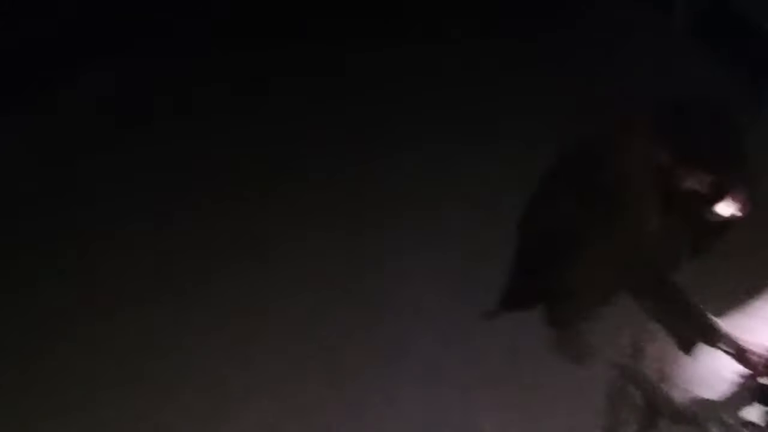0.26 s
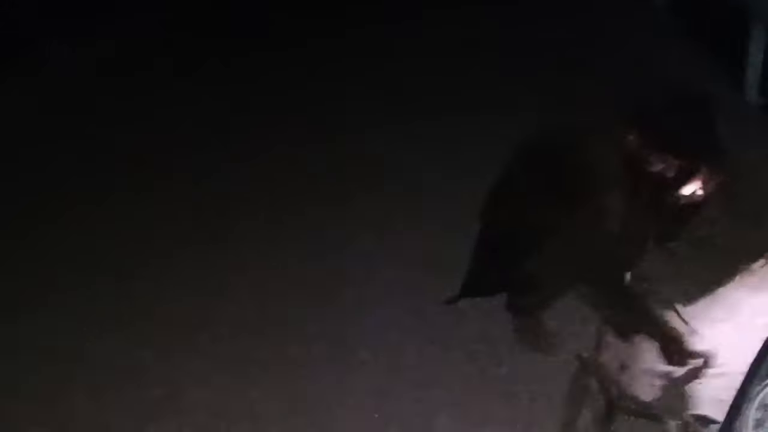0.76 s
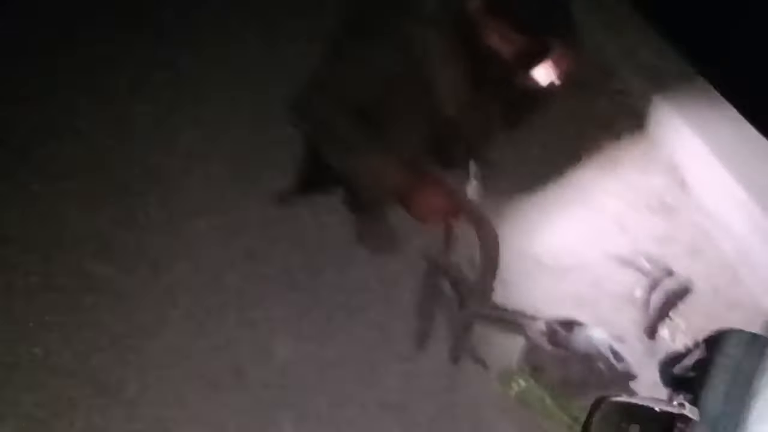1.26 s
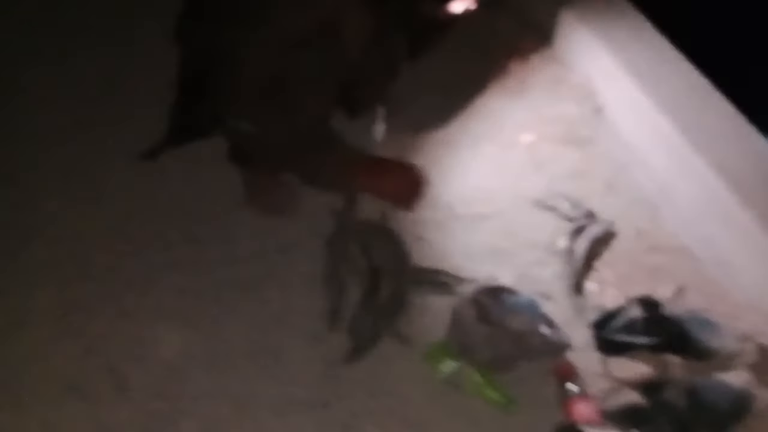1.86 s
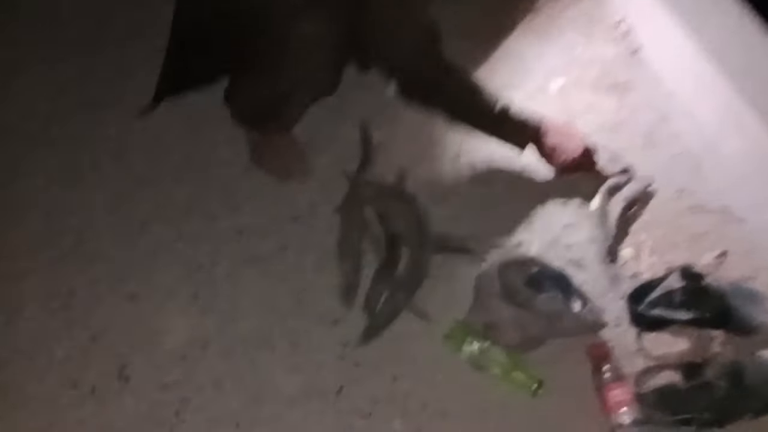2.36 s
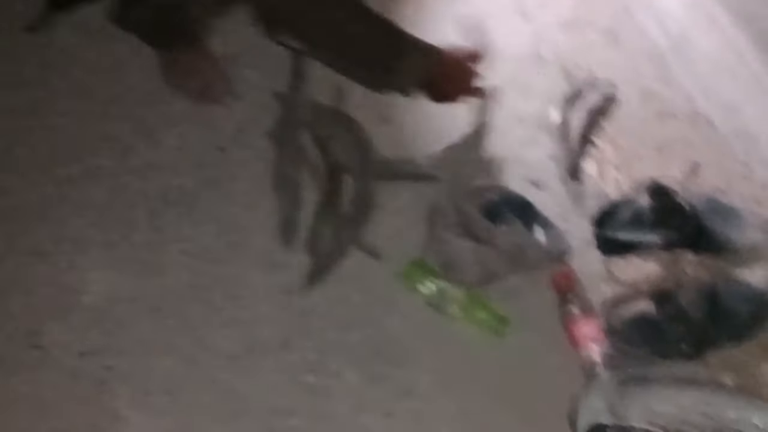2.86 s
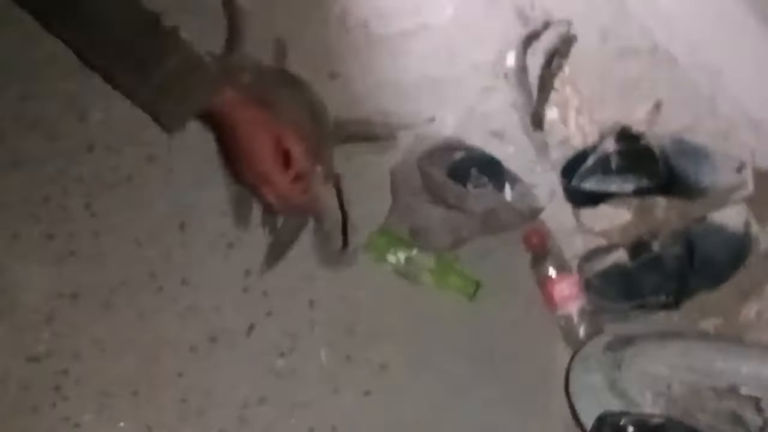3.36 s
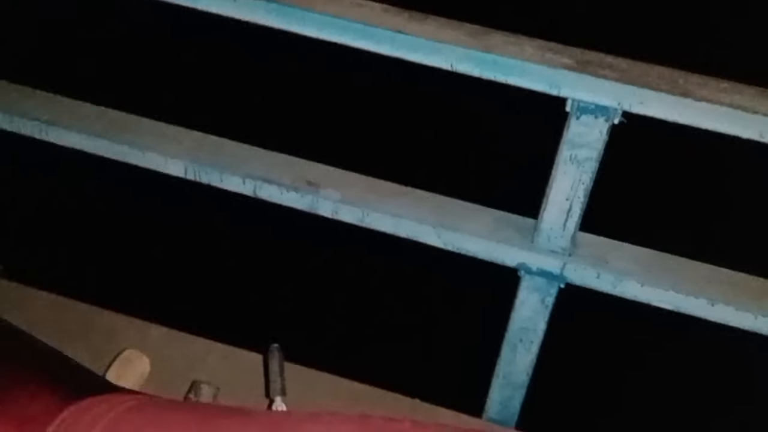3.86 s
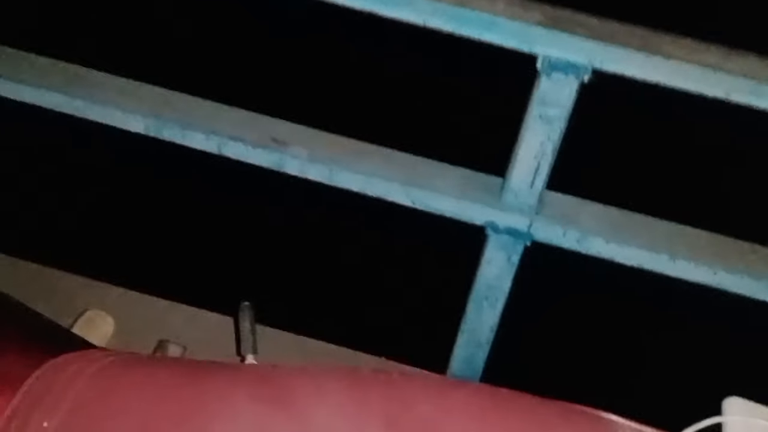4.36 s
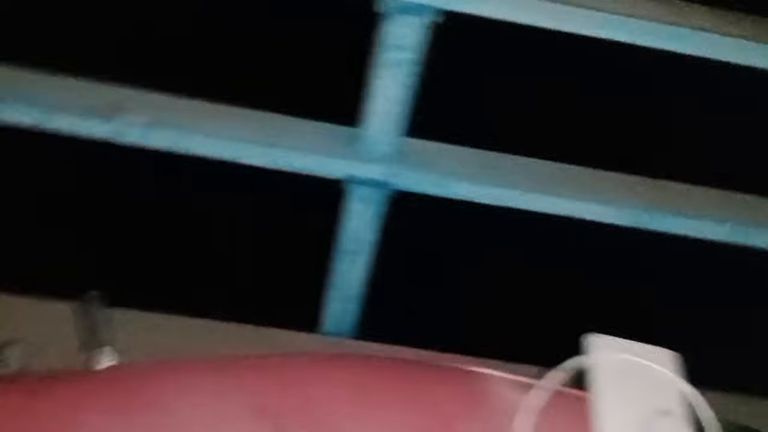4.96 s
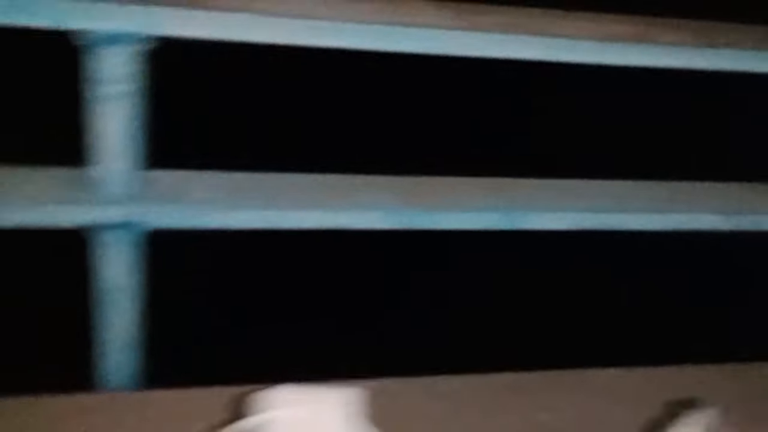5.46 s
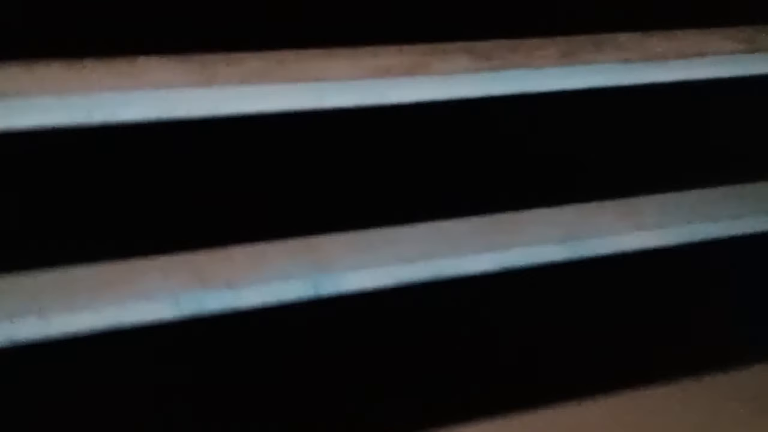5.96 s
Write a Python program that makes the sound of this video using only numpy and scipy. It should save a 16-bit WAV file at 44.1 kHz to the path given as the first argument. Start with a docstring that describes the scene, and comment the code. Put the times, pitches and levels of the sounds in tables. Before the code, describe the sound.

Night insects whistle and trill over faint hiss, with close rustles, a sharp knock near three seconds, then a stronger cricket chorus.

```python
"""Tree crickets whistle chirps and short, mostly rising phrases: near-sine notes with harmonics, outdoors at night.
Trilling comes in bursts of gated tone; far choruses shimmer as narrow noise bands over air, hiss and rumble.
Close by, things are dragged (grains) and set down on concrete (struck resonances), and a hand shifts on
the phone (dull low thumps). Part-way through the phone moves to another spot and the whole night is louder."""
import sys
import numpy as np
from scipy import signal
from scipy.fft import rfft, irfft, next_fast_len
from scipy.io import wavfile

SR = 44100
rng = np.random.default_rng(int(sys.argv[2]) if len(sys.argv) > 2 else 0)


def generate_wav(sig):
    """Save sig (samples, or channels by samples) to the path in sys.argv[1] as 16-bit PCM at SR."""
    pcm = np.round(np.clip(np.atleast_2d(sig).T, -1, 1) * 32767).astype(np.int16)
    wavfile.write(sys.argv[1], SR, pcm)


N = 273243


def from_db(db):
    """dB to gain."""
    return 10 ** (np.asarray(db) / 20)


def rms_one(x):
    """Scale to rms 1."""
    return x / np.sqrt(np.mean(x ** 2) + 1e-20)


def in_time(rows):
    """Columns of a curve table at every sample."""
    s, *columns = np.transpose(rows)
    return [np.interp(np.arange(N) / SR, s, column) for column in columns]


def coloured(x, spectrum):
    """Weight x by a spectrum drawn on a log frequency axis, -80 dB beyond its ends; rms 1."""
    size = next_fast_len(N)
    hz, db = np.transpose(spectrum)
    bins_hz = np.arange(1, size // 2 + 2) * SR / size   # one whole bin up avoids log(0)
    gain = from_db(np.interp(np.log(bins_hz), np.log(hz), db, -80, -80))
    return rms_one(irfft(rfft(x, size) * gain, size)[:N])


def drift(rate_hz):
    """Slow chance: noise through two equal one-pole lowpasses, rms 1."""
    r = np.exp(-2 * np.pi * rate_hz / SR)
    slow = signal.lfilter([1], [1, -2 * r, r * r], rng.standard_normal(N + SR))
    return rms_one(slow[SR:])   # drop the second in which the filter settles


def resonate(x, hz, width_hz):
    """One resonance with gain 1 on top."""
    r = np.exp(-np.pi * width_hz / SR)
    poles = [1, -2 * r * np.cos(2 * np.pi * hz / SR), r * r]
    return signal.lfilter([(1 - r * r) / 2, 0, (r * r - 1) / 2], poles, x)


def add(out, s, sound):
    """Mix a sound in, starting at s seconds."""
    i = round(s * SR)
    sound = sound[max(-i, 0):max(N - i, 0)]
    out[max(i, 0):max(i, 0) + len(sound)] += sound


# The two spots of the phone, one row each: air level/dB, low chorus level/dB, high chorus level/dB,
# treble hiss level/dB, rumble level/dB, lift of the far trill and murmur/dB
SPOTS = [(-75.5, -73, -72.5, -71.5, -83.5, -2.3), (-67.5, -61, -58.5, -61, -73.5, 4)]


def spot_levels(move_s=3.66, move_takes_s=0.039):
    """Each level passes from the first spot to the second as the phone moves."""
    moved = np.clip((np.arange(N) / SR - move_s) / move_takes_s + .5, 0, 1)
    return [first + (second - first) * moved for first, second in zip(*SPOTS)]


def patchy(x, patch_db, rate_hz):
    """Half-octave bands swell and sink on their own, as far-off small noises come and go."""
    out = x
    for low_hz in 100 * 2 ** np.arange(0, 5, .5):
        edges = signal.butter(1, [low_hz, low_hz * np.sqrt(2)], "band", fs=SR, output="sos")
        out = out + (from_db(patch_db * drift(rate_hz)) - 1) * signal.sosfilt(edges, x)
    return out


def chorus(hz, width_hz, throbs_per_s, throb_db):
    """Many distant wings: a steep-sided band of noise, throbbing unevenly."""
    edges = signal.butter(2, [hz - width_hz, hz + width_hz], "band", fs=SR, output="sos")
    band = resonate(signal.sosfilt(edges, rng.standard_normal(N)), hz, width_hz)
    throb = np.sin(2 * np.pi * np.cumsum(throbs_per_s * (1 + 0.14 * drift(1.3))) / SR)
    return rms_one(band * from_db(throb_db * throb + 2.2 * drift(9)))


def notes(rows, glide, waver, octave_db):
    """Near sines: pitch climbs through each note by glide (share per s) and wavers in proportion to it."""
    out, wobble, t = np.zeros(N), drift(170), np.arange(-4000, 4000) / SR
    for (s, hz, db, rise_ms, fall_ms), start in zip(rows, rng.random(len(rows))):
        # half height one rise before and one fall after the peak
        shape = .5 ** (((1000 * t / np.where(t < 0, rise_ms, fall_ms)) ** 2) ** .85)
        i = round(s * SR) % (N - len(t))
        pitch_hz = hz * (1 + glide * t + waver * wobble[i:i + len(t)])
        phase = 2 * np.pi * (np.cumsum(pitch_hz) / SR + start)
        octave = from_db(octave_db) * np.sin(2 * phase) * (hz < 6000)
        add(out, s + t[0], from_db(db) * shape * (np.sin(phase) + octave))
    return out


def far_whistles(level_db):
    """Distant crickets sing rising five-note phrases with third harmonics, at random moments."""
    rows = []
    phrases = rng.random((26, 3)) * [N / SR, 450, 6.0] + [0, 3950, -3]   # start s, Hz, dB
    for (s, hz, db), uneven in zip(phrases, rng.standard_normal((26, 5))):
        for k, u in enumerate(uneven):
            at, pitch = s + 0.049 * k + 0.0064 * u, hz + 60 * k + 15 * u
            rows.append((at, pitch, db - 9 + 3 * u, 14, 16))
            rows.append((at, 3 * pitch, db - 2.5 + 4 * u, 9, 9))
    return from_db(level_db) * notes(rows, glide=0.41, waver=.003, octave_db=-37.5)


def buzz():
    """A buzzing insect: four thin lines one stroke rate apart, wavering in level and phase."""
    t, out = np.arange(N) / SR, np.zeros(N)
    for k in range(4):
        line = np.sin(2 * np.pi * (9870 + 232 * k) * t + 1.5 * drift(5.2))
        out += from_db(4.0 * drift(2.8)) * line
    return out


# Spectra of the still air, treble hiss and rumble: f/Hz, relative level per Hz/dB
AIR = [(90, -24), (200, 5), (500, 0), (1300, -1), (2600, -5.5), (3300, -2.5), (4400, -4.5), (5100, -7),
       (7000, -7), (16000, -16.5)]
HISS = [(6500, -37), (7400, -18), (7750, 2), (8500, 5.5), (9400, -0.5), (11200, -3), (12200, -2),
        (13200, -4.5), (15900, -4.5)]
RUMBLE = [(15, -10), (30, -5), (55, -4.5), (120, 1), (260, -12)]
# Swell of the night's layers, added to the spot levels: t/s, air level/dB, low chorus level/dB,
# high chorus level/dB, hiss level/dB, rumble level/dB
SWELLS = [(0, -0.5, 2.5, 1, 1, -2.5), (.7, 1.2, 4, 1.5, 2, 3), (1.0, 2.5, 0, 2.5, 1, -6),
          (1.3, .1, 4.5, 2, 1, 13), (1.65, 4.5, -3.5, -6, 2.3, 4), (2.05, 1, -1.5, 2, 2.5, 1.5),
          (2.4, 0.3, -2, -3, 8, -.1), (2.7, 0.5, -4, -1, 0, 1), (3.1, 0.5, -6.5, 0.5, 3.5, -0.5),
          (3.55, -0.5, 1, -0.5, -1, -3), (3.7, 1.5, 0, -3.5, 1.5, 3), (3.9, 0, -0.5, .1, -2, -0.5),
          (4.3, -1.4, .1, 1, 0.3, -1), (4.7, 1.5, .1, -2, 1, -4), (5.0, -0.5, -0.3, 2, 1.5, -4.5),
          (5.3, 1.5, -0.8, 1, -1.5, 0), (5.8, -1.5, 0.6, -0.7, -1.5, -2.5), (6.2, 2.5, 1.2, 0, -1.5, -6.5)]


def night():
    """Still air, lumpy rumble and treble hiss as coloured noise, with choruses, a buzz and far singers."""
    air_db, low_db, high_db, hiss_db, rumble_db = np.add(spot_levels()[:-1], in_time(SWELLS))
    still = patchy(coloured(rng.standard_normal(N), AIR), patch_db=0.5, rate_hz=3.1)
    air = from_db(air_db + .5 * drift(9.1)) * still
    rumble = from_db(rumble_db + 1.5 * drift(4.0)) * coloured(rng.standard_normal(N), RUMBLE)
    hiss = from_db(hiss_db + 1.7 * drift(18)) * coloured(rng.standard_normal(N), HISS)
    low = from_db(low_db) * chorus(5906, 290, 15.0, 2.5)
    # far whistlers, run together
    blur = from_db(low_db - 21.5) * (chorus(4300, 60, 1.4, 4.0) + chorus(4500, 120, 21.0, 3.0))
    high = from_db(high_db) * (chorus(8920, 300, 30.0, 2.9) + from_db(-14.0) * chorus(12100, 400, 16.0, 4.0))
    singers = from_db(hiss_db - 16) * buzz() + far_whistles(hiss_db - 9.5)
    return air + rumble + hiss + low + blur + high + singers


# Faint short tones of no clear source: t/s of the peak, f/Hz, peak level/dB, rise/ms, fall/ms
TONES = [(.97, 1940, -73, 36, 52), (1.11, 1080, -73, 20, 7.2), (4.12, 230.6, -61.5, 40, 44),
         (4.52, 6940, -64.5, 18.5, 50), (4.6, 610, -62, 29, 49), (4.61, 1572, -62, 24, 35),
         (4.9, 6900, -65.5, 29, 15), (5.18, 440, -66, 37, 19), (5.49, 1550, -65.5, 44, 48),
         (5.69, 6700, -69, 14.5, 13), (5.76, 6650, -58.5, 12, 17), (6.01, 2220, -68, 24, 26)]


def faint_tones():
    """Single near sines, strongly wavering in pitch, that swell and fade."""
    return notes(TONES, glide=0.029, waver=0.037, octave_db=-55)


# Dull thumps through the case: t/s, peak level/dB, f/Hz, t60/s
THUMPS = [(0.31, -63.5, 101, 0.34), (0.372, -48.5, 115.5, 0.1), (0.831, -58, 63, 0.14),
          (0.857, -46, 70, 0.14), (1.269, -46, 69.3, 0.091), (1.299, -31, 197, 0.021),
          (1.444, -45.5, 69.6, 0.3), (1.481, -42.5, 85.5, 0.14), (1.738, -60, 110, 0.092),
          (1.826, -51, 177, 0.1), (1.983, -68, 89, 0.25), (2.213, -62, 187, 0.075), (2.473, -71, 85, 0.15),
          (3.057, -50.5, 186, 0.094), (3.07, -42, 160, 0.15), (3.102, -53, 122.3, 0.066),
          (3.728, -58, 92, 0.12), (5.889, -59.5, 69, 0.24)]


def thumps(soft_ms=2.4):
    """A soft push on the phone sets a few low cycles going."""
    out, t = np.zeros(N), np.arange(12000) / SR
    for s, db, hz, t60 in THUMPS:
        shape = (1 - np.exp(-1000 * t / soft_ms)) * from_db(-60 * t / max(t60, .02))
        add(out, s, from_db(db) * shape / shape.max() * np.sin(2 * np.pi * hz * t))
    return out


# Spectra of dull grit and of bright swish (the swish also colours the crack of a knock):
# f/Hz, relative level per Hz/dB
GRIT = [(90, -25.5), (150, 6.5), (460, 2), (640, -4.5), (1200, -4.5), (2300, -2.5), (3200, -14),
        (3900, -14.5), (4600, -30), (5100, -52.5)]
SWISH = [(3060, -50), (5200, -43.5), (5650, -8.5), (7710, 2), (9350, -7.5), (10100, -6.5), (13900, -13),
         (15500, -14)]
# Strokes of dragging and rustling: start t/s, end t/s (where letting go begins), grit level/dB before toning,
# grit centre f/Hz, swish level/dB at the start, fade over the stroke/dB
DRAGS = [(1.299, 1.378, -36, 760, -49, 14.5), (1.378, 1.458, -40, 620, -51, 6),
         (1.458, 1.53, -41, 1500, -47.5, 6), (1.52, 1.6, -42.5, 1350, -52.5, 21.5),
         (1.603, 1.683, -53.5, 890, -72, 13), (1.73, 1.79, -67, 1170, -81, 11),
         (1.838, 1.875, -36.5, 960, -49.5, 25), (1.87, 1.94, -57, 1420, -71, 9.5),
         (2.03, 2.11, -67, 2100, -74, 11), (2.222, 2.28, -58, 640, -73, 19),
         (2.38, 2.46, -78, 1500, -68, -5), (2.455, 2.51, -61, 1980, -65, 19),
         (2.52, 2.58, -68, 2150, -80, 14), (2.765, 2.83, -58, 1980, -71, 23),
         (3.054, 3.074, -40.5, 1090, -61, 0), (3.071, 3.097, -18, 1490, -41, 22.5),
         (3.103, 3.124, -17.5, 1180, -38, 20), (3.12, 3.162, -46, 1250, -65, 24.5),
         (3.15, 3.2, -63.5, 2000, -78, 2), (3.204, 3.25, -51.5, 2240, -81.5, 19.5),
         (3.25, 3.32, -66, 1900, -80, 4.5), (4.41, 4.45, -62.5, 2000, -80, 22),
         (4.47, 4.52, -63, 2270, -67, 14), (4.8, 4.87, -63, 2000, -61.5, 4.5),
         (4.865, 4.905, -73.5, 2100, -61, -4), (4.901, 4.99, -61.5, 2180, -50, 11.5),
         (5.01, 5.06, -64.5, 1810, -61, 12), (5.08, 5.144, -72.5, 1590, -68, -17),
         (5.154, 5.198, -52.5, 1200, -53, 16)]


def drags(grains_per_s=1100, spread_db=3.0, breadth_octaves=1.01, catch_s=0.0054, let_go_s=.02, judder_db=1):
    """Dense uneven grains of sliding contact: dull grit and a bright swish, silent between strokes."""
    sizes = from_db(spread_db * np.minimum(rng.exponential(1, N), 4)) * rng.choice([-1, 1], N)
    grains = (rng.random(N) < grains_per_s / SR) * sizes + 0.078 * rng.standard_normal(N)
    grit = coloured(grains, GRIT)
    swish = coloured(0.6 * grains + rng.standard_normal(N), SWISH)
    centres = np.geomspace(200, 4500, 10)
    bands = [resonate(grit, hz, 0.32 * hz) for hz in centres]
    out, t = np.zeros(N), np.arange(N) / SR
    judder = judder_db * drift(25)
    for start, end, grit_db, centre_hz, swish_db, fade_db in DRAGS:
        moving = np.clip(np.minimum((t - start) / catch_s, (end - t) / let_go_s + 1), 0, 1)
        moving = moving * from_db(judder - fade_db * np.clip((t - start) / (end - start), 0, 1))
        # the grit is weighted around a centre that follows what is rubbed
        weights = np.exp(-(np.log2(centres / centre_hz) / breadth_octaves) ** 2)
        toned = sum(weight * band for weight, band in zip(weights, bands))
        out += moving * (from_db(grit_db) * toned + from_db(swish_db) * swish)
    return out


# Knocks and ticks: t/s, peak level of the body/dB with its lower mode, body f/Hz, width as a share of body f,
# t60 of the rattle/s (10 ms at least), treble level/dB (the crack plays 6 dB below it)
KNOCKS = [(0.301, -55.5, 810, 0.82, 0.14, -65), (0.765, -51.5, 2160, 0.41, 0.1, -68),
          (0.844, -55, 2900, 0.45, 0.084, -55), (0.889, -59, 1870, 0.31, 0.076, -61),
          (1.297, -34, 283, 0.54, 0.037, -52), (1.382, -30.5, 444, 0.94, 0.016, -55),
          (1.398, -43, 996, 1, 0.051, -55), (1.42, -44, 370, 0.81, 0.038, -55),
          (1.457, -37, 1140, 0.86, 0.049, -40), (1.465, -35, 1500, 0.6, 0.03, -50),
          (1.48, -40, 2220, 0.59, 0.073, -52), (1.524, -32, 2420, 0.7, 0.049, -45),
          (1.575, -45, 2310, 0.34, 0.034, -71), (1.819, -49.5, 670, 0.6, 0.1, -62),
          (1.837, -28, 930, 0.61, 0.0084, -41), (2.044, -55.5, 2140, 0.31, 0.11, -46),
          (2.222, -45, 500, 0.76, 0.097, -64), (2.459, -45.5, 1970, 0.29, 0.15, -49),
          (2.521, -46.5, 2110, 0.32, 0.16, -67), (2.642, -59.5, 2260, 0.4, 0.12, -62),
          (2.77, -52.5, 2060, 0.43, 0.18, -58), (3.054, -28, 480, 0.83, 0.12, -40),
          (3.071, -17.5, 2150, 0.16, 0.024, -30), (3.081, -31, 2290, 0.36, 0.017, -44),
          (3.102, -7.5, 1020, 0.89, 0.034, -24.5), (3.106, -16.5, 583, 0.99, 0.024, -50),
          (3.111, -15, 1360, 0.7, 0.017, -55), (3.127, -58.5, 1210, 0.23, 0.041, -36),
          (3.139, -32, 2110, 0.48, 0.026, -64), (3.202, -43, 2210, 0.31, 0.067, -91),
          (3.21, -41.5, 2100, 0.36, 0.038, -61), (3.289, -54, 2750, 0.4, 0.062, -62.5),
          (3.344, -59, 2340, 0.41, 0.05, -59), (3.628, -56.5, 2080, 0.27, 0.05, -64),
          (3.751, -48, 1373, 0.73, 0.07, -51), (4.432, -42, 1760, 0.19, 0.084, -63.5),
          (4.444, -40, 2310, 0.24, 0.13, -50), (4.495, -33.5, 2410, 0.36, 0.072, -51),
          (4.81, -53, 2070, 0.2, 0.13, -57.5), (5.029, -42.5, 1873, 0.32, 0.12, -49),
          (5.27, -55, 810, 0.38, 0.068, -59), (5.295, -45.5, 1640, 0.4, 0.12, -49),
          (5.963, -37, 360, 0.55, 0.046, -66), (5.984, -50.5, 426, 0.28, 0.059, -56)]


def knocks(rattle_db=-6, treble_t60=0.012, contact_ms=1.2):
    """A click and a dying rattle drive the body resonances, with a short bright crack."""
    out, t = np.zeros(N), np.arange(8000) / SR
    body_noise, bright = rng.standard_normal(N), coloured(rng.standard_normal(N), SWISH)
    contact = 1 - np.exp(-(1000 * t / contact_ms) ** 2)
    dull = signal.butter(4, 3500, fs=SR, output="sos")
    for s, db, hz, share, t60, treble_db in KNOCKS:
        i, width = min(round(s * SR), N - len(t)), np.clip(share, .05, 1.5) * hz
        rattle = from_db(rattle_db - 60 * t / max(t60, .01)) * contact
        drive = rattle * body_noise[i:i + len(t)] / np.sqrt(hz / 100)
        drive[round(contact_ms * SR / 1000)] += 1.5   # the click
        body = resonate(resonate(resonate(drive, hz, width), hz, 2.2 * width), hz, 0.83 * width)
        body = signal.sosfilt(dull, body)
        lower_mode = resonate(resonate(drive, hz / 2, width / 2), hz / 2, width / 2)
        body += from_db(-15.5) * lower_mode
        crack = from_db(treble_db - 6.0 - 60 * t / treble_t60) * contact * bright[i:i + len(t)]
        add(out, s, from_db(db) * body / np.abs(body).max() + crack)
    return out


# Bursts of trilling: start t/s, end t/s (middle of the fall), level/dB, swell/s
BURSTS = [(0.14, 0.32, -69.5, 0.063), (0.443, 0.65, -68.5, 0.02), (0.948, 1.19, -76, .1),
          (1.38, 1.656, -65, 0.019), (1.7, 1.763, -74, .03), (1.801, 1.892, -65.5, .02),
          (2.023, 2.4, -88, 0.031), (2.6, 2.814, -72.5, 0.088), (2.994, 3.203, -68.5, 0.034),
          (3.45, 3.62, -80, 0.14), (3.647, 3.783, -57.5, 0.043), (3.881, 4.184, -57, 0.035),
          (4.377, 4.638, -57, 0.025), (4.845, 5.166, -53.5, 0.11), (5.246, 5.296, -61, 0.018),
          (5.55, 5.774, -59.5, 0.071), (5.975, 6.25, -56.5, .13)]


def trill(hz=3140, strokes_per_s=54.0, sharp=1.5, fall_s=0.033, join_in_db=-10.5, far_db=-78.5, murmur_db=-80.5):
    """Each wing stroke is a short tone on a steady pitch; more distant males blur into a band just above."""
    t, bursts = np.arange(N) / SR, np.zeros(N)
    for start, end, db, swell_s in BURSTS:
        shape = np.clip(np.minimum((t - start) / swell_s, (end - t) / fall_s + .5), 0, 1)
        bursts += from_db(db) * shape ** 2
    lift_db = spot_levels()[-1]
    # distant males join in more softly and slightly higher, and murmur on between
    far = from_db(join_in_db + 1.0 * drift(6)) * bursts + from_db(far_db + lift_db + 3.5 * drift(9.3))
    strokes = np.cumsum(strokes_per_s * (1 + 0.031 * drift(4.3))) / SR
    gate = np.abs(np.sin(np.pi * strokes)) ** sharp * from_db(2.4 * drift(40))
    pitch_hz = hz * (1 + 0.005 * drift(2.5) + 0.0033 * drift(60))
    near = rms_one(gate * np.sin(2 * np.pi * np.cumsum(pitch_hz) / SR))
    return (bursts + from_db(murmur_db + lift_db)) * near + far * chorus(3260, 110, 46.0, 3.0)


# Chirps of the low whistlers: t/s of the first peak, f/Hz, peak level/dB, swell/ms, second note's level/dB
CHIRPS = [(-.012, 3940, -46.5, 16, -56.5), (.274, 3983, -67, 14, -74), (0.368, 4050, -68, 8.8, -80),
          (.44, 3904, -61, 30, -56), (0.483, 3960, -45.5, 8.2, -52.5), (.696, 4000, -70, 18, -83),
          (.771, 4059, -64.5, 16, -70), (.904, 3945, -47.5, 21.6, -52.5), (1.074, 4040, -70, 18, -83),
          (1.143, 3980, -61.5, 14, -67), (1.351, 3936, -51.5, 17, -49.5), (1.808, 3957, -50.5, 30, -49.5),
          (2.066, 4020, -72, 28, -78), (2.32, 3950, -49.5, 25, -52.5), (2.389, 3994, -59, 10, -64),
          (2.66, 3994, -63, 12, -70), (2.816, 3929, -55.5, 25, -50.5), (3.253, 3946, -58.5, 46, -59.5),
          (3.49, 4015, -64, 30, -66), (3.637, 3990, -61.5, 33, -69), (3.721, 3960, -40, 17, -40.5),
          (3.98, 4000, -66.5, 31.6, -72), (4.162, 3946, -38.5, 13.4, -43), (4.215, 4020, -51, 7, -65),
          (4.295, 3950, -65, 12, -63.5), (4.548, 3900, -57, 10, -59), (4.596, 3951, -39.5, 17.5, -48.5),
          (4.645, 4005, -48.5, 5.6, -63.5), (4.79, 3970, -64, 25, -67.5), (4.844, 3960, -58, 17, -61),
          (5.26, 3900, -53.5, 15, -64), (5.316, 3953, -40, 13.4, -42.5), (5.401, 4080, -54, 3.8, -72.5),
          (5.582, 3994, -58.5, 21, -64), (5.647, 3985, -61, 26, -62), (5.816, 3964, -45.5, 17.3, -48.5),
          (5.868, 4013, -39, 20.5, -61.5), (5.947, 3930, -66, 18, -52), (6.188, 3940, -48, 19, -50)]


def chirp_rows(break_s=.031, step_up_hz=42.05):
    """A swelling note, then a higher one with a quick rise; slower swells also fall more slowly."""
    rows = []
    for s, hz, db, swell_ms, second_db in CHIRPS:
        rows.append((s, hz, db, swell_ms, 4.4 + 0.36 * swell_ms))
        rows.append((s + break_s, hz + step_up_hz, second_db, 4.5, 8.5))
    return rows


# Phrases of the high whistlers: first note t/s, last note t/s, first f/Hz, last f/Hz, first and last fundamental
# level/dB, first and last third-harmonic level/dB; notes scatter about these
PHRASES = [(0.055, .183, 4640, 4795, -78, -78, -66, -55), (0.037, .12, 4420, 4550, -69, -63, -67, -62),
           (.33, .345, 4510, 4515, -74, -75, -78, -80), (.625, .64, 4245, 4250, -71, -71, -80, -80),
           (0.387, .471, 4263, 4511, -69, -68, -78, -64), (0.602, .656, 4797, 4814, -64, -65, -48.5, -54),
           (.692, .818, 4740, 4785, -78, -80, -60, -59), (0.848, .89, 4390, 4500, -68, -75, -66, -63),
           (1.121, 1.167, 4480, 4511, -74, -66, -67, -73), (1.219, 1.322, 4620, 4900, -76, -68, -68, -52),
           (1.376, 1.45, 4565, 4710, -65, -70, -76, -76), (1.995, 2.083, 4700, 4800, -80, -78, -61, -54),
           (2.22, 2.431, 4320, 4550, -80, -80, -59.5, -60),
           (2.353, 2.41, 4770, 4785, -80, -77, -46.5, -52.5),
           (2.481, 2.556, 4420, 4700, -66, -76, -68, -67), (2.82, 2.963, 4460, 4610, -72, -79, -62, -64),
           (3.003, 3.082, 4800, 4785, -78, -78, -56, -56),
           (3.344, 3.44, 4460, 4618, -72, -70.5, -75.5, -67.5),
           (3.483, 3.537, 4800, 4805, -76, -78, -57, -59), (3.682, 3.71, 4800, 4850, -78.5, -75, -56, -63),
           (3.895, 3.976, 4500, 4500, -66, -70.5, -61, -64.5),
           (3.957, 4.087, 4340, 4510, -56, -51, -71.5, -64),
           (4.113, 4.183, 4580, 4780, -57.5, -56.5, -56.5, -52.5),
           (4.295, 4.345, 4580, 4550, -58.5, -62.5, -63.5, -61.5),
           (4.382, 4.5, 4770, 4860, -59, -68.5, -55.5, -47),
           (4.539, 4.677, 4400, 4600, -52, -54.5, -64, -55),
           (4.707, 4.758, 4710, 4800, -71.5, -71, -52.5, -51),
           (4.862, 5.01, 4390, 4590, -56, -55.5, -61.5, -53),
           (5.042, 5.107, 4820, 4815, -57, -55.5, -52, -50),
           (5.429, 5.537, 4460, 4510, -74, -56, -55, -55.5),
           (5.533, 5.62, 4240, 4300, -70.5, -78, -62.5, -66),
           (5.835, 5.972, 4560, 4500, -66.5, -69, -72, -69.5),
           (5.89, 5.998, 4700, 4827, -78, -68, -59, -52.5), (6.063, 6.179, 4730, 4845, -79, -75, -54, -57)]


def phrase_rows(gap_s=.043, bend=1, uneven_db=3.5, uneven_s=.002, uneven_hz=15,
                flutter_s=.02, flutter_db=-7.5, sag_hz=151):
    """Notes step from first to last pitch; each third harmonic stutters once more, lower and mostly softer."""
    rows = []
    note_ms, harmonic_ms = (8, 7), (8.2, 5)   # (rise, fall)
    chances = rng.standard_normal((len(PHRASES), 8, 4))
    for (first, last, first_hz, last_hz, *levels_db), uneven in zip(PHRASES, chances):
        # share of the phrase still to come
        left = np.linspace(1, 0, max(round((last - first) / gap_s), 1) + 1)
        for x, (a, b, c, d) in zip(left, uneven):
            s = last - x * (last - first) + uneven_s * c
            hz = last_hz - (last_hz - first_hz) * x ** bend + uneven_hz * d
            levels = np.reshape(levels_db, (2, 2)) @ [x, 1 - x]
            db, harmonic_db = levels + uneven_db * np.array([a, b])
            stutter_db = harmonic_db + flutter_db + uneven_db * c
            rows.append((s, hz, db, *note_ms))
            rows.append((s, 3 * hz, harmonic_db, *harmonic_ms))
            rows.append((s + flutter_s, 3 * hz - sag_hz * abs(a), stutter_db, *harmonic_ms))
    return rows


def whistlers():
    """Tree crickets' near-pure whistles, chirps and phrases, with a faint octave on the low notes."""
    return notes(chirp_rows() + phrase_rows(), glide=0.14, waver=0.001, octave_db=-20.0)


def scatter(x, t60):
    """A short diffuse tail off ground, rails and leaves: dying noise after a 6 ms gap; unit energy."""
    t = np.arange(SR // 5) / SR
    tail = rng.standard_normal(len(t)) * from_db(-60 * t / max(t60, .05)) * (t > .006)
    return signal.fftconvolve(x, tail / np.sqrt(np.sum(tail ** 2)))[:N]


def scene():
    """Insect song with its tail, the night, and the handling close by."""
    background = night() + faint_tones()
    close = knocks()
    handling = thumps() + drags() + close
    song = trill() + whistlers()
    tails = from_db(-6.0) * scatter(song, t60=0.2) + from_db(-24.0) * scatter(close, t60=0.13)
    return (background + handling + song + tails)[None]


def record(dry):
    """The top is cut steeply at 15.5 kHz and the input rests a little below zero."""
    steep = signal.cheby1(24, .5, 15500, fs=SR, output="sos")
    return -.0005 + signal.sosfilt(steep, dry)


dry = scene()
out = record(dry)
generate_wav(out)
```